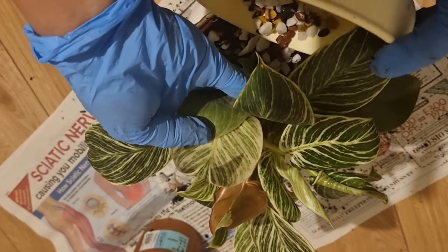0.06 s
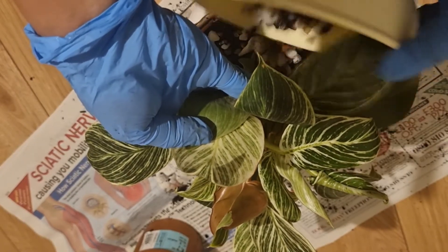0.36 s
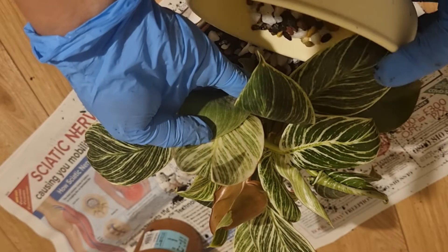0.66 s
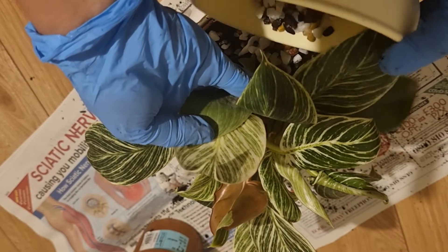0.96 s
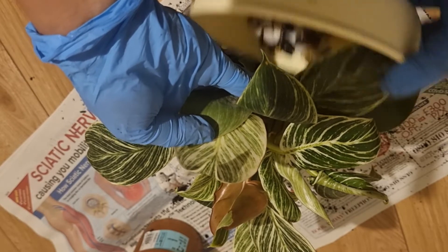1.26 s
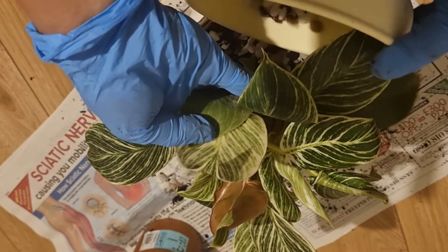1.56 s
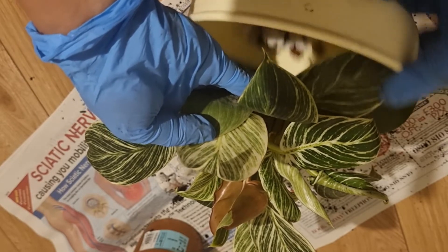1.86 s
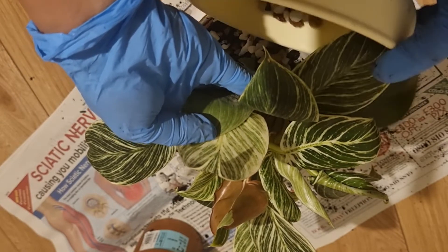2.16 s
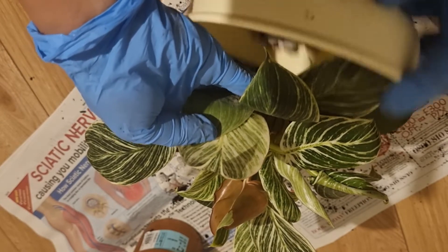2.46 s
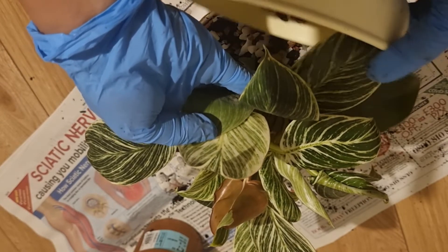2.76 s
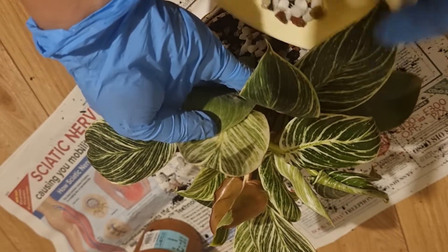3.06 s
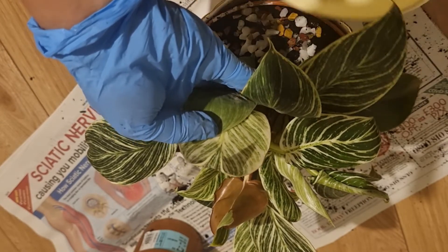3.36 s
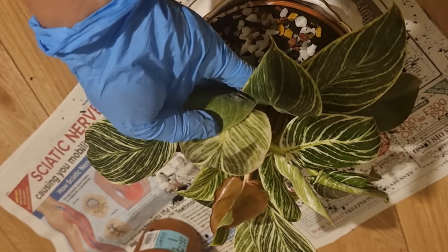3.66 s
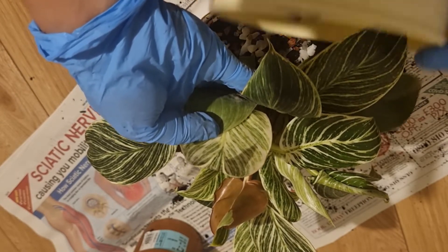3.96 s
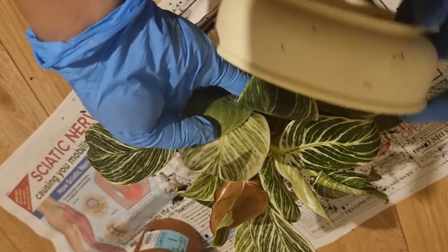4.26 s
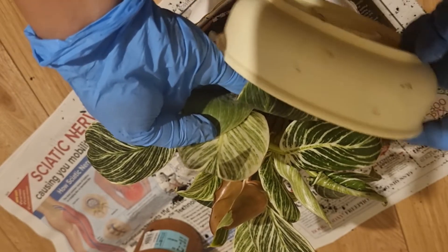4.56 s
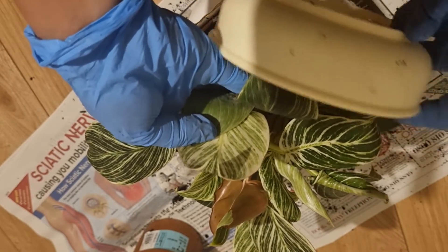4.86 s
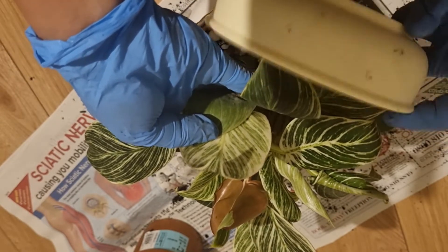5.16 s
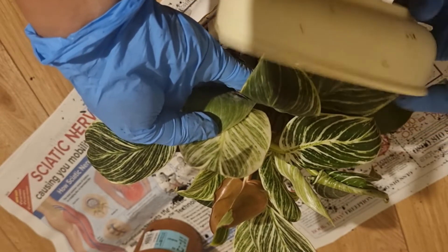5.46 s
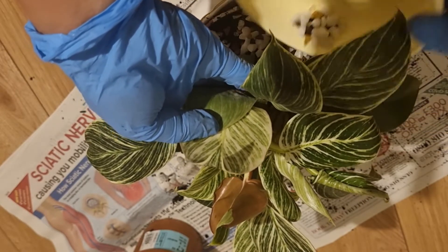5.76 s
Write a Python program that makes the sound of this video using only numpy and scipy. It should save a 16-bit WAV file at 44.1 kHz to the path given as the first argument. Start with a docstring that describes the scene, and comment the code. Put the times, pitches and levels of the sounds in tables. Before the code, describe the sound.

Small gravel is shaken from a plastic tub onto soil in a plant pot, heard close in a small, quiet room. Five short shakes come at about 0.4, 0.9, 1.5, 2.1 and 2.6 seconds. Each is a gritty, hissing slide of tiny clicks, with sharp clacks of single stones and hollow drumming from the tub wall. The first and third are the strongest, the last is weak. Dull tub thuds stand out near 0.4, 1.5 and 2 seconds, over a very low sway of the wooden floor. From 3 to 4 seconds there is a lull with faint rubber glove rubs and a few tiny ticks. From about 4.1 to 5.5 seconds the remaining stones roll inside the tilted tub in a softer, uneven rattle with scattered clacks and light bumps. A last faint shift comes near 5.8 seconds.

```python
"""A small room with a wooden floor: gravel is shaken from a plastic tub onto the soil of a plant pot.
Five shakes send pebbles sliding over the lip; after a pause the rest are rolled in the tilted tub.
Each slide is a swarm of tiny ringing contacts. Single stones clack and the tub wall drums.
Beneath them the tub bumps softly, gloves rub and the floor sways under the movement."""
import sys
import numpy as np
from scipy import signal
from scipy.fft import rfft, irfft
from scipy.io import wavfile
from scipy.ndimage import uniform_filter1d

SR = 44100
rng = np.random.default_rng(int(sys.argv[2]) if len(sys.argv) > 2 else 0)


def wav_out(sig):
    """Save sig, one row per channel (or a flat mono array), as 16-bit PCM at SR to the path in sys.argv[1]."""
    wavfile.write(sys.argv[1], SR, np.round(np.clip(np.atleast_2d(sig).T, -1, 1) * 32767).astype(np.int16))


N = 256662
TIME = np.arange(N) / SR
POURING = TIME < 3.5  # rolling afterwards


def from_db(db):
    """Decibels to gain."""
    return 10 ** (np.asarray(db) / 20)


def unit_rms(x):
    """Scale to unit power."""
    return x / np.sqrt(np.mean(x ** 2) + 1e-20)


def at_hz(points, hz):
    """Read a table on a log-frequency axis."""
    points_hz, values = np.transpose(points)
    return np.interp(np.log(np.maximum(hz, 1)), np.log(points_hz), values)


def butter(x, kind, edges_hz, order=2):
    """Butterworth filter."""
    return signal.sosfilt(signal.butter(order, edges_hz, kind, fs=SR, output="sos"), x)


def coloured(x, spectrum, size=4096):
    """Minimum-phase filter with the given spectrum."""
    bins_hz = np.arange(size // 2 + 1) * SR / size
    cepstrum = irfft(np.log(from_db(at_hz(spectrum, bins_hz))))
    fold = 1 + np.sign(size // 2 - np.arange(size))
    fold[0] = 1
    response = irfft(np.exp(rfft(cepstrum * fold)))
    return signal.oaconvolve(np.atleast_2d(x), response[None], axes=-1)[:, :np.shape(x)[-1]]


def resonance(x, hz, width_hz):
    """Two-pole resonator, unit peak gain."""
    r = np.exp(-np.pi * width_hz / SR)
    feedback = [1, -2 * r * np.cos(2 * np.pi * hz / SR), r * r]
    return signal.lfilter(np.array([1, 0, -1]) * (1 - r * r) / 2, feedback, x + 1e-18)


def decay(t, t60_s):
    """Envelope losing 60 dB in t60_s."""
    return np.exp(-np.log(1000) * t / t60_s)


def add(track, start_s, sound):
    """Mix a sound into a track."""
    start = max(round(start_s * SR), 0)
    track[..., start:start + sound.shape[-1]] += sound[..., :N - start]


def evened(x, span_s):
    """Hold the running power at 1, keeping the fine grain."""
    power = uniform_filter1d(np.mean(np.atleast_2d(x) ** 2, axis=0), int(span_s * SR))
    return x / np.sqrt(np.maximum(power, 0) + 1e-4 * power.mean())


def placed(x, lead_s, pan_db):
    """Stereo pair: left is earlier by lead_s, louder by pan_db."""
    delayed = np.interp(TIME - round(lead_s * SR) / SR, TIME, x)
    return np.array([x * from_db(pan_db / 2), delayed * from_db(-pan_db / 2)])


def contacts(rate_per_s, spread_db):
    """Random clicks: many small, a few large."""
    sizes = from_db(spread_db * np.minimum(rng.exponential(1, N), 4)) * rng.choice([-1, 1], N)
    return sizes * (rng.random(N) < rate_per_s / SR)


# freq_hz, gain_db
AIR_SPECTRUM = [(20,1.5),(45,-4),(85,0),(130,-14.5),(230,-19.5),(350,-14.5),(450,-24.5),(560,-17),(800,-30),(2000,-28),(4500,-35.5),(8000,-42.5),(16000,-41.5)]
def room_air(air_db=-70, hum_db=-82):
    """Quiet room noise, mono in the bass, with a faint wavering hum."""
    shared, sides = rng.standard_normal(N), rng.standard_normal((2, N))
    noise = butter(shared, "band", (13, 600)) + butter(sides, "band", (600, 20000)) + 0.16 * sides
    air = unit_rms(coloured(noise, AIR_SPECTRUM))
    hum = unit_rms(resonance(rng.standard_normal(N), hz=345, width_hz=30))
    return from_db(air_db) * air + from_db(hum_db) * hum


# freq_hz, t60_s
ROOM_DECAY = [(200,.28),(1000,.23),(4000,.24),(8000,.19),(15000,.13)]
def room(x):
    """The room's tail, dying sooner in the treble."""
    t, edges_hz = TIME[:SR // 3], np.geomspace(150, 19000, 8)
    tail = 0
    for low_hz, high_hz in zip(edges_hz, edges_hz[1:]):
        noise = butter(rng.standard_normal((2, len(t))), "band", (low_hz, high_hz))
        tail += noise * decay(t, at_hz(ROOM_DECAY, np.sqrt(low_hz * high_hz)))
    return signal.oaconvolve(x, unit_rms(tail * (t > .004)) / np.sqrt(len(t)), axes=-1)[:, :N]


def scatter(x, t60_s):
    """Quick reflections between tub, pot and floor, weaker in the treble."""
    t = TIME[:4096]
    noise = butter(rng.standard_normal((2, len(t))), "band", (150, 7100))
    response = unit_rms(noise * decay(t, t60_s) * (t > .0008)) / np.sqrt(len(t))
    return signal.oaconvolve(x, response, axes=-1)[:, :N]


# pitch_hz, t60_s
FLOOR_MODES = [(26,0.69),(41.5,.58),(54,0.38)]
# start_s, low_mode_db, mid_mode_db, high_mode_db
FLOOR_SWAYS = [(0.411,-42,-28.5,-41.5),(1.011,-33.5,-25,-31),(1.64,-30.5,-32,-35),(2.306,-42,-45.5,-39.5),(2.881,-38,-37.5,-44),(3.585,-43,-45,-56)]
def floor_sways(swell_s=0.0099):
    """Shifting weight swings the floor at the bottom of hearing."""
    out, t = np.zeros(N), TIME[:SR]
    for start_s, *levels_db in FLOOR_SWAYS:
        swing = sum(from_db(db) * np.sin(2 * np.pi * hz * t) * decay(t, t60_s)
                    for db, (hz, t60_s) in zip(levels_db, FLOOR_MODES))
        add(out, start_s, swing * (1 - np.exp(-t / swell_s)) ** 2)
    return placed(out, lead_s=.0001, pan_db=-3)


# start_s, length_s, level_db, pitch_hz, nominal_width_hz
GLOVE_RUBS = [(.18,0.064,-59.5,338,170),(0.189,0.16,-58,143,96),(1.052,0.24,-72.5,340,111),(3.126,0.15,-67,353,58.6),(3.301,0.22,-73.5,345,70),(3.6,0.34,-77,125.4,60.65),(3.696,0.17,-72.5,261,110.8),(4.041,0.13,-68.5,271,182.5),(5.57,.15,-69,355,70)]
def glove_rubs():
    """Rubber drags on tub and leaves: a dull swell of friction."""
    out = np.zeros(N)
    for start_s, length_s, level_db, pitch_hz, nominal_width_hz in GLOVE_RUBS:
        noise, width_hz = rng.standard_normal(SR // 2), 0.81 * nominal_width_hz
        friction = resonance(resonance(noise, pitch_hz, width_hz), pitch_hz, width_hz)
        swell = signal.windows.tukey(int(length_s * SR), .6)
        add(out, start_s, from_db(level_db) * swell * unit_rms(friction[-len(swell):]))
    return placed(out, lead_s=.0002, pan_db=6.5)


# pitch_hz, level_db, t60_s
TUB_BODY_MODES = [(50.5,-8.5,0.61),(73,8.5,.29),(96,-7.5,0.054),(140,-5.5,0.32)]
# freq_hz, gain_db
THUD_SPECTRUM = [(60,-8.5),(125,2.5),(200,-6.5),(270,-7),(340,-2.5),(420,-10),(560,-13),(800,-14),(1300,-38)]
# start_s, boom_db, thud_db
TUB_BUMPS = [(0.0,-67,-51.5),(0.386,-38,-27),(1.45,-46.5,-31.5),(2.043,-37.5,-24.5),(2.658,-52.5,-40),(2.714,-49.5,-44),(4.351,-59,-61.5),(4.773,-48.5,-46),(5.034,-48.5,-60),(5.412,-45.5,-43.5),(5.735,-50.5,-52)]
def tub_bumps(thud_t60_s=0.13, swell_s=0.016):
    """The loaded tub is jolted: a dull thud, and its low modes boom."""
    booms, thuds, t = np.zeros(N), np.zeros(N), TIME[:SR // 2]
    boom = sum(from_db(db) * np.sin(2 * np.pi * hz * t) * decay(t, t60_s)
               for hz, db, t60_s in TUB_BODY_MODES)
    boom *= 1 - np.exp(-t / swell_s)
    for start_s, boom_db, thud_db in TUB_BUMPS:
        thud = coloured(rng.standard_normal(len(t)) * decay(t, thud_t60_s), THUD_SPECTRUM)[0]
        add(booms, start_s, from_db(boom_db) * boom)
        add(thuds, start_s, from_db(thud_db) * thud / np.abs(thud).max())
    return placed(booms, lead_s=.00012, pan_db=1.5) + placed(thuds, lead_s=.00025, pan_db=2)


# pitch_hz, width_hz, pouring_db, rolling_db
TUB_WALL_MODES = [(389,45,-10,-14),(475,85,-5,-20.5),(542.3,40,-2.5,-3),(666,23,3,-0.5),(715.4,40,-9.5,-1)]
def tub_wall(drive_db):
    """Stones drum on the plastic; it rings higher in rolling, with the load further back."""
    taps = contacts(rate_per_s=600, spread_db=2)
    rings = 0
    for pitch_hz, width_hz, pouring_db, rolling_db in TUB_WALL_MODES:
        mode = resonance(resonance(taps, pitch_hz, width_hz), pitch_hz, 4 * width_hz)
        rings += from_db(np.where(POURING, pouring_db, rolling_db)) * mode
    rings = butter(rings, "band", (340, 780), order=6)
    return placed(from_db(drive_db - 6) * evened(rings, span_s=0.049), lead_s=.0001, pan_db=0)


# pitch_hz, width_hz, gain
TUB_HOLLOW_MODES = [(1670, 70, 0.31), (2170, 70, .3), (2400, 31, 0.16), (2875, 190, .6), (4060, 220, 0.2),
                    (5150, 200, .25), (5600, 230, .3)]
def tub_hollow(x):
    """The open tub favours a few pitches, swallows a lower one and throws the deep rattle left."""
    x = x + sum(gain * resonance(x, hz, width_hz) for hz, width_hz, gain in TUB_HOLLOW_MODES)
    x = butter(x, "bandstop", (780, 1090))
    return x + resonance(x, hz=1710, width_hz=1400) * [[.35], [-.35]]


def stray_strikes(rattle_db, bright_db, count=130, spread_db=6.5):
    """Clack rows for lesser stones: random times, level and brightness following the slide."""
    at = ((np.arange(count) + rng.random(count)) / count * (N - 1)).astype(int)
    depth_db, tilt_db = spread_db * np.clip(rng.standard_normal((2, count)), -2, 2)
    return list(zip(TIME[at], rattle_db[at] + 4.5, depth_db - 7, bright_db[at] - 5 + tilt_db))


# edges of the deep, middle and bright bands
CLACK_EDGES_HZ = (1100, 2500, 6500, 17000)
# start_s, strength_db, depth_db, bright_db
STONE_STRIKES = [(0.336, -39, -21, 2), (0.3924, -24, -9, 3), (0.4044, -30.5, 5, 11.5),
                 (0.4089, -23, 1.5, -24), (0.5973, -48.5, -28, 5), (0.611, -47.5, -22, -6),
                 (0.9304, -36, -3, -15.5), (0.9499, -29, 2.5, 4), (0.9974, -35.5, 7.5, -13),
                 (1.1659, -67, 14, -26.5), (1.4097, -39.5, -15.5, 3), (1.4548, -16.5, -26, -25),
                 (1.496, -21.5, -1, -4), (1.5731, -18.5, -17.5, -19), (1.5893, -21.5, -38, -10),
                 (1.6136, -33, -29, -2), (1.6574, -22.5, -35, -5.5), (1.7037, -31.5, -24, -12),
                 (1.8762, -44, -1, -25), (1.9424, -40, -5.5, -36), (1.964, -53, 8.5, -33),
                 (2.0455, -30, -4, -12), (2.0497, -28.5, 0.5, 8.5), (2.1176, -29.5, -2.5, -3.5),
                 (2.1735, -27, -14.5, -10.5), (2.5301, -46.5, -9, -10), (2.9548, -57, 4.5, -23),
                 (3.137, -65, -10, -13), (3.5173, -77.5, 9.5, -10), (3.9873, -76.5, 11, -0.5),
                 (4.1118, -30.5, -8, -24.5), (4.1344, -37.5, -19, -23), (4.2615, -30, -11.5, -25),
                 (4.644, -31, -15.5, -11), (4.8181, -40.5, -19, 0), (4.8273, -38.5, -0.5, -9),
                 (4.8612, -31.5, -30, -29), (4.8759, -33.5, -29, -0.5), (4.999, -33, -38, -21),
                 (5.2302, -33.5, 1.5, 6.5), (5.3256, -44, -3, 3.5), (5.4531, -45, 2, 9.5),
                 (5.608, -67, -3, -20)]
def stone_clacks(strays, snap_t60_s=.0032, chatter_t60_s=0.022, chatter_db=-10, rms_span_s=0.0026):
    """A stone snaps and chatters briefly: deeper on the tub, brighter on another stone."""
    out, t = np.zeros(N), TIME[:2048]
    envelope = decay(t, snap_t60_s) + from_db(chatter_db) * decay(t, chatter_t60_s)
    for start_s, strength_db, depth_db, bright_db in list(STONE_STRIKES) + strays:
        burst = rng.standard_normal(len(t)) * envelope
        pitch_hz = np.clip(4700 * from_db(0.076 * bright_db), 3500, 5000)  # dull stones ring lower
        burst += 3 * resonance(burst, pitch_hz * rng.uniform(0.99, 1.01), width_hz=900)
        clack = 0
        for k, gain in enumerate((from_db(depth_db), -1, from_db(bright_db))):
            part = butter(burst, "band", CLACK_EDGES_HZ[k:k + 2])
            clack += gain * part / np.sqrt(np.sum(part ** 2) / (rms_span_s * SR))
        add(out, start_s, from_db(strength_db - 3.5) * clack)
    return placed(out, lead_s=.00014, pan_db=3)


def surge(peak_s, rise_s, hold_s, rise_db=30, settle_db_per_s=397, trickle_db_per_s=160):
    """Flow envelope: stones gather speed and run; the bulk settles, stragglers trickle on."""
    rise = from_db(rise_db * np.minimum(TIME - peak_s, 0) / rise_s)
    after_s = np.maximum(TIME - peak_s - hold_s, 0)
    return rise * (0.6 * from_db(-settle_db_per_s * after_s) + 0.4 * from_db(-trickle_db_per_s * after_s))


# peak_s, rise_s, hold_s, strength_db, bright_db, wall_db
GRAVEL_SURGES = [(0.0, .1, 0.0022, -63, -7, -22), (0.399, 0.086, 0.022, -28.5, -4, -7),
                 (0.928, 0.084, 0.059, -38.5, -2.5, -3.5), (1.451, 0.067, .048, -31, -1, -4),
                 (1.587, 0.055, 0.024, -34, -2.5, -9.5), (1.932, 0.31, 0.018, -65, -11, -1.5),
                 (2.048, .06, .015, -33.5, 0.5, -4.5), (2.169, 0.092, 0.013, -39, -3.5, -9),
                 (2.593, 0.1, .025, -47, -7.5, -13.5), (2.654, 0.046, .035, -45, -4, -6.5),
                 (4.125, 0.037, .02, -45, -17.5, -20.5), (4.254, 0.041, .012, -55.5, -6, -22),
                 (4.478, 0.067, .012, -52.5, -3, -15), (4.526, 0.018, .005, -50, -7, -2),
                 (4.606, .08, .05, -42.5, -7.5, -18), (4.744, 0.16, 0.045, -53, -3.5, -21),
                 (4.826, 0.057, 0.012, -42.5, -5, -1.5), (4.887, .04, 0.033, -52, -4, -7),
                 (5.009, 0.11, 0.029, -49, -1, -16), (5.068, .08, 0.036, -52, 1.5, -0.5),
                 (5.152, 0.019, 0.011, -44.5, 1.5, -34), (5.225, 0.12, 0.0088, -41.5, -1, -5),
                 (5.325, 0.057, .005, -52, 0.5, -6.5), (5.408, 0.028, 0.042, -51.5, -2.5, -4),
                 (5.815, 0.15, .005, -65, -10, 10.5)]
def gravel_flow():
    """Each tub move starts a surge. Summed in power: rattle, brightness and wall drive, in dB."""
    power = np.full((3, N), 1e-11)
    for peak_s, rise_s, hold_s, strength_db, bright_db, wall_db in GRAVEL_SURGES:
        rattle = from_db(strength_db) * surge(peak_s, rise_s, hold_s)
        # the wall drums only once the bulk moves: later, steeper swell
        drumming = from_db(strength_db + wall_db) * surge(peak_s, 0.55 * rise_s, hold_s) ** 1.2
        power += np.square([rattle, from_db(bright_db) * rattle, drumming])
    rattle_db, treble_db, drumming_db = 10 * np.log10(power)
    dulling_db = .25 * np.maximum(-58 - rattle_db, 0)  # settling stones lose treble first
    return rattle_db, treble_db - rattle_db - dulling_db, drumming_db


def pebbles(rate_per_s, ring_q=2.6, crack_gain=0.77, size_count=18):
    """Each contact is a bare crack plus the brief ring of one stone size."""
    clicks, sizes = contacts(rate_per_s, spread_db=5.5), rng.integers(0, size_count, N)
    pitches_hz = np.geomspace(1200, 14500, size_count)
    rings = sum(resonance(clicks * (sizes == k), hz, hz / ring_q) * (hz / pitches_hz[0]) ** -.2
                for k, hz in enumerate(pitches_hz))
    return unit_rms(rings) + crack_gain * unit_rms(clicks)


# freq_hz, gain_db
POURED_SPECTRUM = [(410, -24.5), (700, 2.5), (757, -14.5), (934, -1), (1660, -8.5), (2240, -6.5),
                   (2430, -0.5), (2560, -6), (2840, 3), (3240, 1), (4800, -1), (5260, -8), (13900, -1.5),
                   (16000, -9.5)]
ROLLED_SPECTRUM = [(410, -18), (700, 3.5), (910, -44), (1110, -5.5), (1580, -14.5), (1890, -2), (2330, -9),
                   (2800, 0), (3160, 1), (4670, 1), (6570, -9.5), (8880, -8), (15200, -7.5), (16000, -9)]
# spots across the tub: lead_s, pan_db
GRAVEL_SPOTS = [(.00011,-3.5),(.00014,-5),(.00016,5.5),(.00021,2.5)]
def gravel_slide(rattle_db, bright_db, split_hz=7500):
    """A faster slide makes more contacts; poured and rolled stones differ in colour."""
    rate_per_s = 2000 * from_db(.25 * (rattle_db + 43))
    grains = 0
    for lead_s, pan_db in GRAVEL_SPOTS:
        direct = placed(pebbles(rate_per_s), lead_s, pan_db)
        grains += direct + from_db(-2) * scatter(direct, t60_s=0.031)
    grains = np.where(POURING, coloured(grains, POURED_SPECTRUM), coloured(grains, ROLLED_SPECTRUM))
    treble = evened(butter(grains, "high", split_hz, order=4), span_s=0.054)
    rattle = evened(butter(grains, "low", split_hz, order=4), span_s=0.034)
    return from_db(rattle_db + .5) * (rattle + from_db(bright_db - 1.43) * treble)


def scene():
    """Stones and tub sound through the room, over rubs, sways and air."""
    rattle_db, bright_db, drumming_db = gravel_flow()
    slide = gravel_slide(rattle_db, bright_db)
    clacks = stone_clacks(stray_strikes(rattle_db, bright_db))
    stones = slide + clacks + from_db(-9.5) * scatter(clacks, t60_s=0.015)
    stones += room(from_db(-15.5) * slide + from_db(-6.5) * clacks)
    tub = tub_wall(drumming_db) + tub_bumps()
    tub += from_db(-12) * scatter(tub, t60_s=0.016) + from_db(-6.5) * room(tub)
    return tub_hollow(stones) + tub + glove_rubs() + floor_sways() + room_air()


def record(dry):
    """Steep low-pass at 16 kHz."""
    return signal.sosfilt(signal.ellip(10, .1, 80, 16000, fs=SR, output="sos"), dry)


dry = scene()
out = record(dry)
wav_out(out)
```